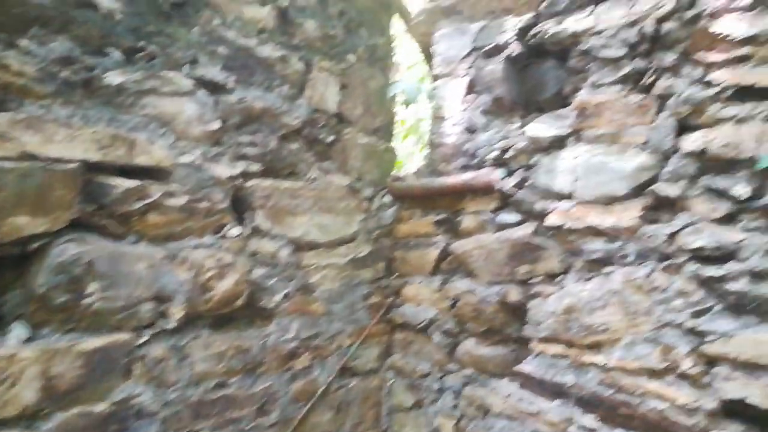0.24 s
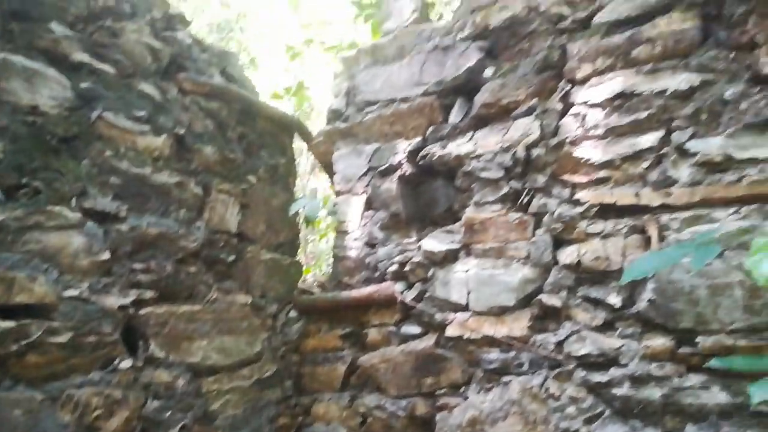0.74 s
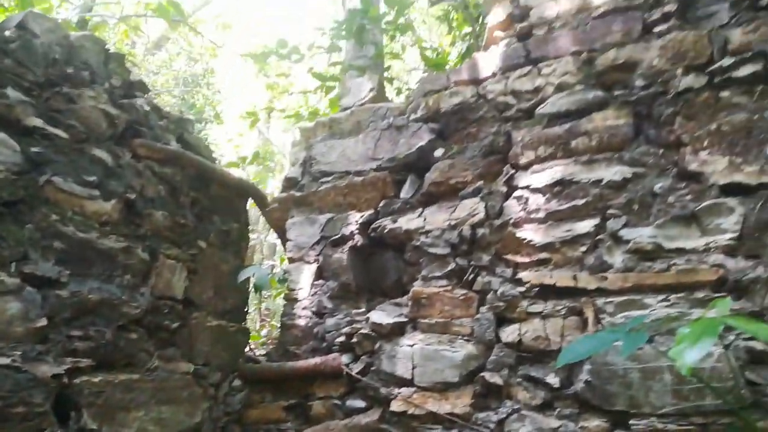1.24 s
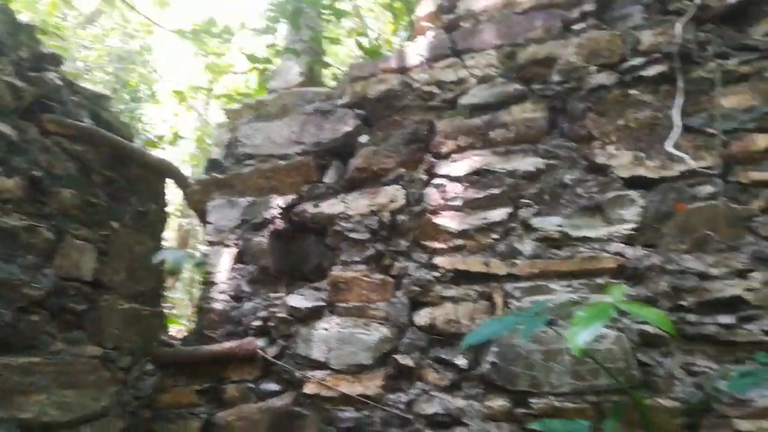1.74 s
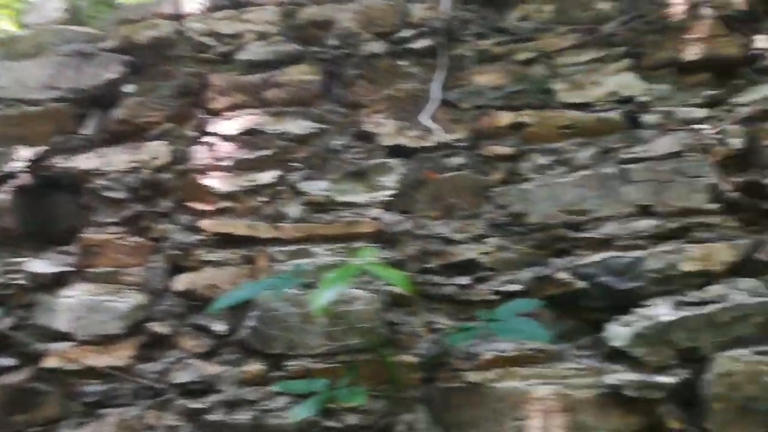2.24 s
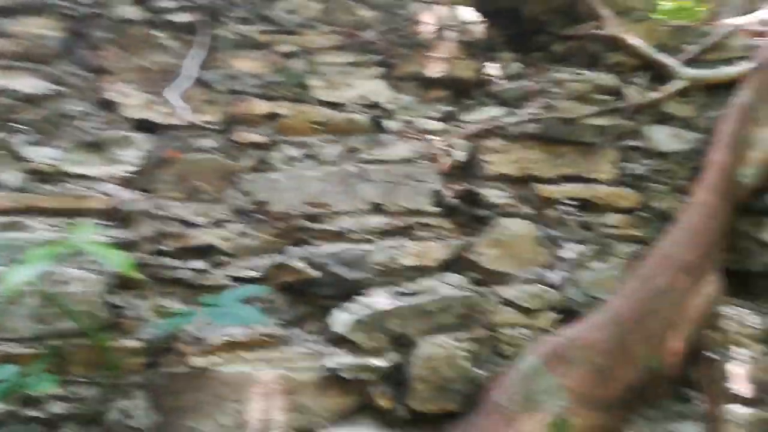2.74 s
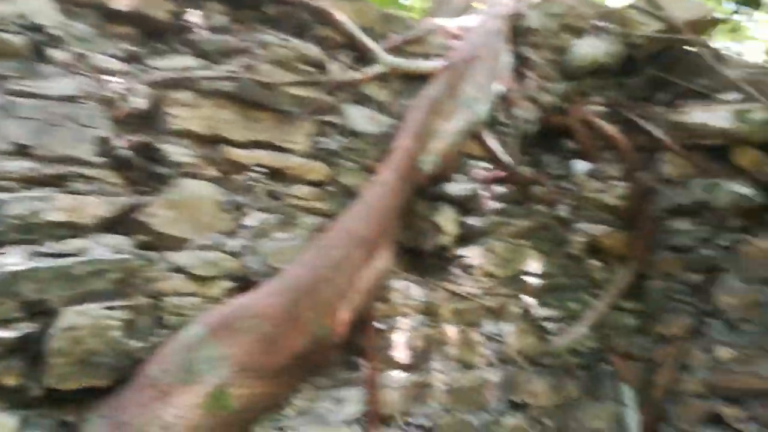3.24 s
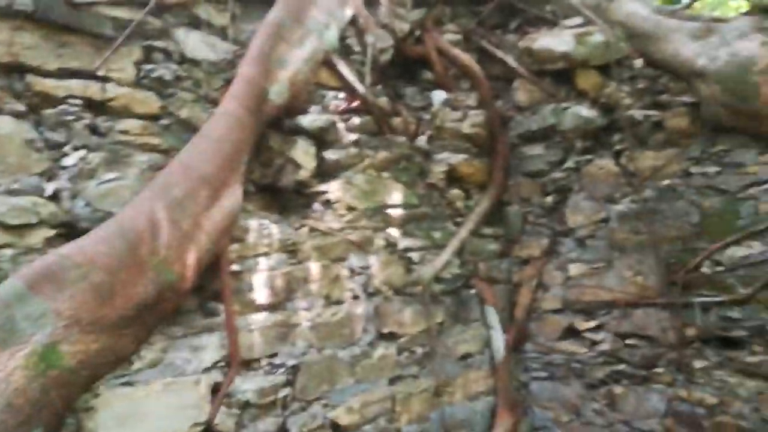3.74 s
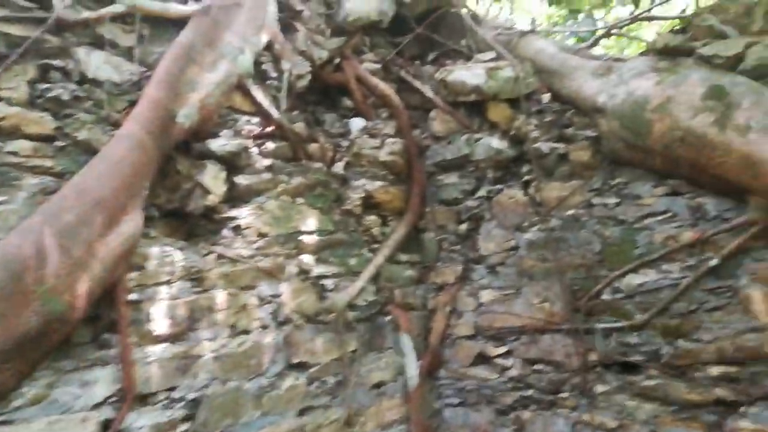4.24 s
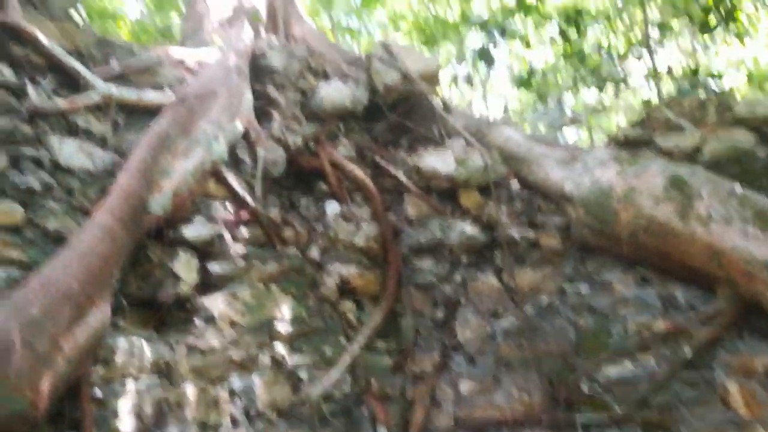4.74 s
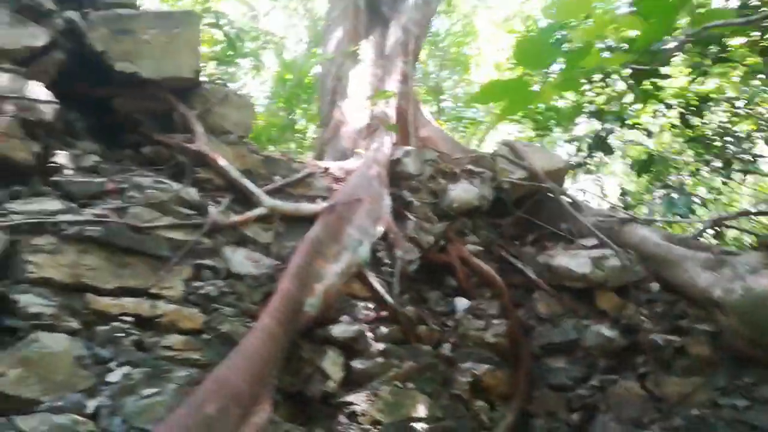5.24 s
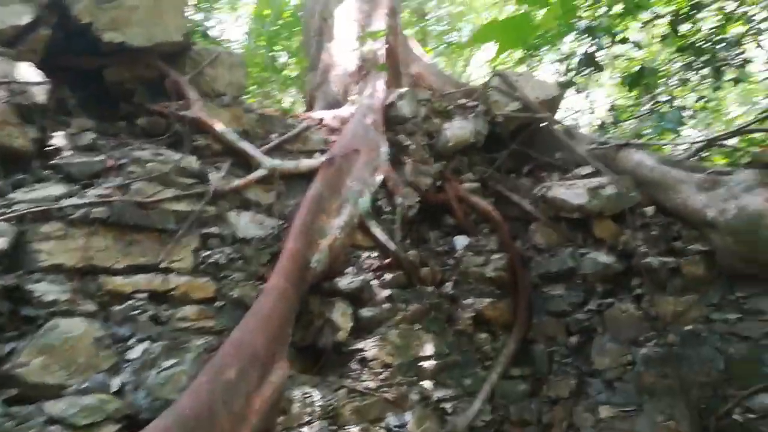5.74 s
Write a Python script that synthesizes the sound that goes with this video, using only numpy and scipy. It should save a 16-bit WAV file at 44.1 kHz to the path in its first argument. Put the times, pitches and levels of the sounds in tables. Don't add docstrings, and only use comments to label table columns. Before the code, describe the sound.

Pulsing high cicada buzz fills a forest among stone walls, while a hand-held phone thumps and ticks softly underneath.

```python
import sys
import numpy as np
from scipy import signal
from scipy.fft import rfft, irfft, next_fast_len
from scipy.io import wavfile
from scipy.ndimage import uniform_filter1d, map_coordinates

SR = 44100
rng = np.random.default_rng(int(sys.argv[2]) if len(sys.argv) > 2 else 0)


def convert_level_to_amplitude(level_db):
    exponent = np.asarray(level_db, float) / 20
    return 10 ** exponent


def waveform_to_disk(signal):
    frames = np.transpose(np.atleast_2d(signal))
    scaled = np.clip(frames, -1, 1) * 32767
    samples = np.round(scaled).astype(np.int16)
    wavfile.write(sys.argv[1], SR, samples)


N = 264600

# (time [s], rate [clicks/s])
NEIGHBOUR_RATE = [(0, 280), (3.8, 255), (4.6, 228), (6, 237)]
# (time [s], knock level [dB], pitch [Hz])
FINGER_TICKS = [(0.3, -44, 176), (0.312, -58, 197), (.423, -48.5, 285), (0.507, -55.5, 198),
                (0.53, -44.5, 231), (0.558, -63, 200), (0.61, -52.5, 202), (0.621, -52, 197),
                (0.92, -57.5, 268), (1.235, -58, 239), (1.264, -55.5, 239), (2.067, -54, 323),
                (2.775, -56, 445), (3.337, -55, 447), (3.724, -58, 477), (4.302, -60.5, 250),
                (4.612, -48, 382), (4.701, -58, 303), (4.719, -61, 200), (4.76, -55.5, 200),
                (4.278, -64, 259), (5.135, -61, 584), (5.151, -53, 412), (5.167, -53, 322),
                (5.273, -58.5, 277), (5.425, -49, 413), (5.458, -50, 318), (5.59, -49.5, 223),
                (5.634, -45.5, 420), (5.646, -52, 240)]


def unit(x):
    return x / np.sqrt(np.mean(x ** 2, axis=-1, keepdims=True) + 1e-20)


def along(points, hz):
    f, v = np.transpose(points)
    return np.interp(np.log(hz + 1), np.log(f + 1), v)


def curves(rows):
    s, *cols = np.transpose(rows)
    return [np.interp(np.arange(N) / SR, s, c) for c in cols]


def wobble(rate_hz):
    knots = rng.standard_normal(int(N * 40 / SR) + 4)
    return map_coordinates(knots, [np.arange(N) * min(rate_hz, 40) / SR])


def filtered(x, response):
    m = next_fast_len(N + 8192)
    return irfft(rfft(x, m) * response(np.fft.rfftfreq(m, 1 / SR)), m)[..., :N]


def noise(points, channels=1):
    white = rng.standard_normal((channels, N) if channels > 1 else N)
    return filtered(white, lambda hz: convert_level_to_amplitude(along(points, hz)))


def body(modes):
    def response(f):
        total = 0
        for k, (centre_hz, width_hz, db) in enumerate(modes):
            damping = 1j * f * width_hz
            total = total + (-1) ** k * convert_level_to_amplitude(db) * damping / (centre_hz ** 2 - f * f + damping)
        return total
    return response


def panned(lead_db):
    return np.sqrt(2 / (1 + convert_level_to_amplitude(np.array([-2 * lead_db, 2 * lead_db]))))


def patchy(x, depth_db, bins, frames):
    z = signal.stft(x, nperseg=512)[2]
    field = uniform_filter1d(rng.standard_normal(z.shape), size=bins, axis=1)
    field = uniform_filter1d(field, size=frames, axis=2)
    return signal.istft(z * convert_level_to_amplitude(depth_db * field / field.std()), nperseg=512)[1][:, :N]


def forest(x, direct):
    # (frequency [Hz], t60 [s])
    decay = [(2000, .11), (12000, .08)]
    step, length = SR // 4, SR // 8
    hz, t, z = signal.stft(rng.standard_normal((N // step + 1, 2, length)), SR, nperseg=256)
    z = z * convert_level_to_amplitude(-60 * t / along(decay, hz)[:, None])
    tails = signal.istft(z, SR, nperseg=256)[1][..., :length]
    tails /= np.linalg.norm(tails, axis=-1, keepdims=True)
    padded, wet = np.pad(x, step), np.zeros((2, N + 4 * step))
    fade = np.sin(np.pi * np.arange(2 * step) / (2 * step))
    for k, tail in enumerate(tails):
        piece = padded[k * step:][:2 * step] * fade
        wet[:, k * step:][:, :2 * step + length - 1] += signal.fftconvolve(piece[None], tail, axes=1)
    return direct * np.array([x, np.roll(x, shift=26)]) + wet[:, step:step + N]


def through_case(x, dull_hz):
    lag_s = 0.00087

    def to_left(hz):
        return np.exp(-2j * np.pi * hz * lag_s) / np.abs(1 + 1j * hz / dull_hz)
    return np.array([filtered(x, to_left), x])


def clicks(rate, jitter, scatter_db):
    chance = rng.standard_normal((2400, 2))
    count = np.cumsum(rate * np.ones(N)) / SR
    k = np.arange(min(int(count[-1]), len(chance)))
    at = np.searchsorted(count, k + jitter * chance[k, 0]).clip(0, N - 1)
    return np.bincount(at, convert_level_to_amplitude(scatter_db * chance[k, 1]), N)


def sung(buckles, modes):
    def response(hz):
        skirts = 1 / np.sqrt((1 + (3500 / (hz + 1)) ** 24) * (1 + (hz / 8600) ** 16))
        return body(modes)(hz) * skirts
    return unit(filtered(buckles, response))


def hum():
    # (frequency [Hz], density [dB per Hz])
    spectrum = [(200, -20), (500, -7), (1200, 1), (2000, 0), (2500, -1.5), (3200, -0.5), (9000, -6.5),
                (16500, -20)]
    # (frequency [Hz], share)
    likeness = [(500, 0.99), (1400, 0.0018), (2500, 0), (4000, 0.12)]

    def alike(hz):
        return np.clip(along(likeness, hz), 0, 1)
    shared = through_case(rng.standard_normal(N), dull_hz=9000)
    shared = filtered(shared, lambda hz: convert_level_to_amplitude(along(spectrum, hz)) * np.sqrt(alike(hz)))
    own = rng.standard_normal((2, N))
    own = filtered(own, lambda hz: convert_level_to_amplitude(along(spectrum, hz)) * np.sqrt(1 - alike(hz)))
    return convert_level_to_amplitude(-69) * unit(shared + own)


def leaves():
    # (frequency [Hz], density [dB per Hz])
    spectrum = [(9000, -32), (9500, -5.5), (11000, -4.5), (12500, -2.5), (13900, -3), (16500, -2.5)]
    # (time [s], level [dB])
    breeze = [(0, -74.5), (.9, -75.5), (1.7, -73), (3.5, -75), (4.7, -77), (5.3, -74), (6, -71.5)]
    return convert_level_to_amplitude(curves(breeze)[0] + 5.5) * unit(noise(spectrum, channels=2))


def shimmer(neighbour_db):
    # (centre [Hz], width [Hz], level [dB])
    wings = [(12450, 400, -9), (15230, 350, -1), (15690, 250, 0)]
    level_db = -74.0 + 0.5 * (neighbour_db - neighbour_db.mean())
    return convert_level_to_amplitude(level_db) * unit(filtered(rng.standard_normal((2, N)), body(wings)))


def air(turn_db, neighbour_db):
    high = leaves() + shimmer(neighbour_db)
    return patchy(hum() + high * panned(1.5 + 1.9 * turn_db), depth_db=1.2, bins=6, frames=8)


def case_jolts(times_s, pulses):
    out = np.zeros(N + 4000)
    for s, pulse in zip(times_s, pulses):
        out[round(s * SR):][:4000] += pulse
    return out[2000:N + 2000]


def thumps(t):
    # (time [s], peak level [dB], pitch [Hz])
    hits = [(.306, -34, 56.6), (0.41, -47, 91.5), (.427, -31, 73.7), (0.494, -30.5, 58), (0.573, -46, 113),
            (0.604, -36.5, 60), (.645, -37, 61.3), (0.748, -48, 105), (.857, -52, 97), (.935, -34, 57.3),
            (1.252, -33, 54.6), (1.495, -44, 59), (2.097, -46.5, 50.6), (2.611, -47, 68), (2.646, -36, 62),
            (2.783, -50, 116), (2.925, -50, 58.3), (3.346, -41.5, 69), (3.429, -49.5, 83),
            (3.706, -49.5, 60.5), (3.759, -49, 80), (4.309, -43.5, 101), (4.426, -45.5, 50),
            (4.634, -38.5, 44), (4.689, -35, 61.6), (4.752, -35.5, 72.5), (4.965, -47, 67.4),
            (4.997, -43, 67), (5.148, -49, 54.3), (5.637, -52, 35.3)]
    # (time [s], peak level [dB], pitch [Hz])
    more_hits = [(0.435, -35, 71), (0.538, -42.5, 51), (.959, -45.5, 45), (1.275, -35.5, 58),
                 (2.693, -40.5, 70), (3.73, -47, 86), (3.746, -48, 85), (4.35, -46, 78),
                 (4.718, -40, 74.6), (4.736, -36, 76), (4.762, -43, 44), (4.788, -43.5, 55),
                 (5.19, -49.5, 50), (5.211, -51, 41)]
    # (time [s], peak level [dB], pitch [Hz])
    last_hits = [(.018, -54, 46), (.28, -50, 38.4), (.896, -54, 37), (3.451, -53, 97), (4.364, -53, 37.6),
                 (4.494, -51, 57), (4.578, -47, 79), (4.661, -42, 91), (5.346, -56, 42), (5.722, -55, 49)]
    rows = hits + more_hits + last_hits
    pulses = [-convert_level_to_amplitude(db) * np.cos(2 * np.pi * hz * t) * np.exp(-(t * hz / 0.57) ** 2) for s, db, hz in rows]
    return case_jolts([s for s, db, hz in rows], pulses)


def knocks(t):
    pulses = []
    for s, db, hz in FINGER_TICKS:
        decay = (t > 0) * convert_level_to_amplitude(-60 * t.clip(0) * hz / 5.5)
        pulses.append(convert_level_to_amplitude(db + 8) * np.sin(2 * np.pi * hz * t) * decay)
    return case_jolts([s for s, db, hz in FINGER_TICKS], pulses)


def snaps(t):
    # (time [s], level [dB])
    creaks = [(.423, -51), (2.47, -59), (2.84, -54.5), (3.337, -53), (3.633, -52), (5.151, -44),
              (5.167, -56), (5.28, -49), (5.322, -51), (5.413, -53), (5.431, -45), (5.457, -64),
              (5.468, -55), (5.588, -55), (5.633, -58), (.531, -60), (2.067, -60), (4.612, -64)]
    rows = [(s, db - 30) for s, db, hz in FINGER_TICKS] + creaks
    decay = (t > 0) * convert_level_to_amplitude(-60 * t.clip(0) / 0.0048)
    pulses = [convert_level_to_amplitude(db + 14.5) * rng.standard_normal(4000) * decay for s, db in rows]
    grit = case_jolts([s for s, db in rows], pulses)
    return filtered(grit, lambda hz: body([(1100, 900, 0)])(hz) / (1 + (hz / 2300) ** 4))


def handling():
    # (time [s], rumble level [dB])
    grip = [(0, -62.5), (.25, -60.5), (.42, -48), (.66, -52), (.8, -61.5), (1.35, -59.5), (1.8, -65.5),
            (2.3, -61), (2.7, -58), (3.05, -64), (3.4, -59.5), (3.75, -65.5), (4.2, -64.5), (4.32, -56.5),
            (4.52, -57.5), (4.75, -45.5), (4.9, -56), (6, -66)]
    # (frequency [Hz], density [dB per Hz])
    rumble_spectrum = [(12, -37), (25, -7), (50, -0.5), (75, -8), (130, -12), (250, -25.5), (600, -54.5)]
    # (frequency [Hz], density [dB per Hz])
    rub_spectrum = [(60, -23), (130, -6.5), (200, -6.5), (400, -3.5), (700, -10), (1500, -38), (3000, -29)]
    rumble_db, = curves(grip)
    rub_db = -72 + 0.24 * (rumble_db - rumble_db.mean())
    for s, _, _ in FINGER_TICKS:
        rub_db = rub_db + 1.5 * np.exp(-((np.arange(N) / SR - s) / 0.042) ** 2)
    rumble = convert_level_to_amplitude(rumble_db) * unit(convert_level_to_amplitude(2.5 * wobble(15)) * noise(rumble_spectrum))
    rub = convert_level_to_amplitude(rub_db) * unit(convert_level_to_amplitude(3.2 * wobble(30)) * noise(rub_spectrum))
    loose = unit(noise(rub_spectrum, channels=2))
    t = np.arange(-2000, 2000) / SR
    in_case = thumps(t) + knocks(t) + snaps(t) + rumble + rub
    return through_case(in_case, dull_hz=440) + convert_level_to_amplitude(rub_db - 6.5) * loose


def far_chorus(far_db, low_lead_db):
    # (frequency [Hz], density [dB per Hz])
    spectrum = [(2400, -34.5), (2900, -24.5), (3500, -16), (4200, -12.5), (4600, -4.5), (5300, 4),
                (5750, -0.5), (6300, -3.5), (7250, -4), (8600, -15.5), (9900, -34), (13000, -67)]
    # (time [s], share of loudest group hidden)
    hidden = [(0, 0.083), (4.2, 0.13), (5.2, 0.21), (6, 0.27)]
    rate = curves(NEIGHBOUR_RATE)[0] * 1.03 + wobble(3)
    steady = unit(forest(clicks(rate, jitter=.01, scatter_db=1.5), direct=0))
    crowd = rng.standard_normal((2, N)) + 0.98 * steady
    far = unit(filtered(crowd, lambda hz: convert_level_to_amplitude(along(spectrum, hz))))
    loudest = filtered(far, lambda hz: np.exp(-((hz - 5300) / 600) ** 2))
    far = far - curves(hidden)[0].clip(0, 1) * loudest
    return far * convert_level_to_amplitude(far_db + 6.5 + 0.58 * wobble(12)) * panned(low_lead_db)


def neighbour_cicada(throb, neighbour_db, turn_db):
    # (centre [Hz], width [Hz], level [dB])
    modes = [(6900, 380, 0), (7280, 380, -2), (7800, 400, -9), (8350, 350, -15)]
    song = sung(clicks(curves(NEIGHBOUR_RATE)[0], jitter=.02, scatter_db=2.5), modes)
    song = unit(forest(song * (.7 + throb), direct=0.11)) * panned(1.6 * turn_db - 2.0)
    return convert_level_to_amplitude(neighbour_db - 1.5) * song


def throbbing():
    # (start [s], level [dB], surge into the run [dB])
    phrases = [(0.042, -48.5, 3), (0.488, -45.5, 5), (0.725, -48, 3.5), (0.987, -45, 2), (1.452, -43.5, 2),
               (1.862, -43.5, 3), (2.216, -44, 4), (2.571, -45, 1.5), (3.031, -44.5, 0), (3.399, -45, 1),
               (3.726, -45, -1.5), (3.993, -49.5, 1.5), (4.11, -47.5, 2.5), (4.33, -51.5, 5),
               (4.467, -50, 6), (4.733, -53.5, 4), (5.04, -53, -10), (5.305, -53.5, -5), (5.58, -61.5, -4),
               (5.872, -60, 4)]
    # (time [s], throb period [s])
    period = [(0, .0455), (1.5, .0468), (2.2, .049), (3, .053), (3.4, .054), (3.75, .058), (4.8, .062),
              (6, .062)]
    # (time [s], share of a swell)
    rest = [(0, .25), (1, .06), (2.8, .15), (4, .3), (4.6, .9), (6, 1.6)]
    t, at = np.arange(N) / SR, []
    starts, level_db, surges_db = np.transpose(phrases)
    for start, end in zip(starts, [*starts[1:], N / SR]):
        gap_s = np.interp(start, *np.transpose(period))
        at.extend(np.arange(start, end - gap_s / 2, gap_s))
    sizes = convert_level_to_amplitude(1.5 * rng.standard_normal(200)[:len(at)])
    bell = signal.windows.gaussian(4001, std=.011 * SR)
    swells = np.bincount((np.array(at) * SR).astype(int), sizes, N)
    between, = curves(rest)
    throb = between + signal.fftconvolve(swells, bell, "same")
    lead_s, width_s = 0.03, 0.049
    surge_db = sum(db * np.exp(-((t - s + lead_s) / width_s) ** 2) for s, db in zip(starts, surges_db))
    throb = throb + 0.76 * (convert_level_to_amplitude(surge_db) - 1).clip(0)
    return throb / (1 + between), np.interp(t, starts, level_db), surge_db


def near_cicada(throb, near_db, low_lead_db):
    # (centre [Hz], width [Hz], level [dB])
    modes = [(3810, 240, -12), (4550, 210, 1.5), (4880, 260, -10), (5870, 250, -11), (6850, 350, -10),
             (7200, 400, -11), (7900, 450, -17)]
    song = sung(clicks(285 + 1.5 * wobble(3), jitter=.04, scatter_db=2.5), modes)
    return convert_level_to_amplitude(-3.5) * forest(throb * convert_level_to_amplitude(near_db) * song, direct=0.86) * panned(low_lead_db + 0.5)


def scene():
    # (time [s], far chorus level [dB], neighbour level [dB], left side turned to the trees [dB])
    chorus = [(0, -54, -55, 1), (.5, -54.5, -52, 6), (.9, -54.5, -46.5, 5), (1.2, -53, -49.5, 2),
              (1.75, -55, -48, 0.5), (2.3, -53.5, -49, 1), (2.7, -54.5, -49.5, 1), (3.5, -54, -49.5, 0.5),
              (4.1, -54, -53, 1), (4.7, -55.5, -55.5, 3), (5.1, -57, -50, -0.5), (5.7, -56.5, -61, -1.5),
              (6, -56, -58.5, -1.5)]
    throb, near_db, surge_db = throbbing()
    far_db, neighbour_db, turn_db = curves(chorus)
    neighbour_db = neighbour_db + 0.29 * surge_db
    low_lead_db = 10.5 + 0.3 * turn_db
    others = far_chorus(far_db, low_lead_db) + neighbour_cicada(throb, neighbour_db, turn_db)
    others = patchy(others, depth_db=1.7, bins=2, frames=30)
    near = near_cicada(throb, near_db + 0.22 * surge_db, low_lead_db)
    return air(turn_db, neighbour_db) + handling() + others + near


def band_limit(x):
    return signal.sosfilt(signal.butter(12, 15790, fs=SR, output="sos"), x)


def record(dry):
    return band_limit(dry)


dry = scene()
out = record(dry)
waveform_to_disk(out)
```